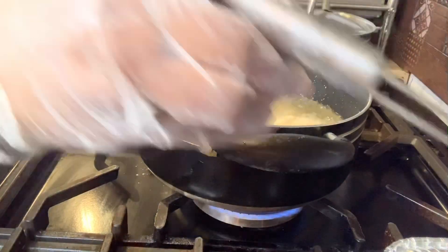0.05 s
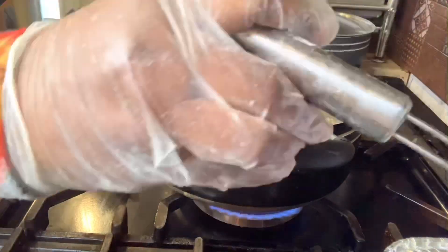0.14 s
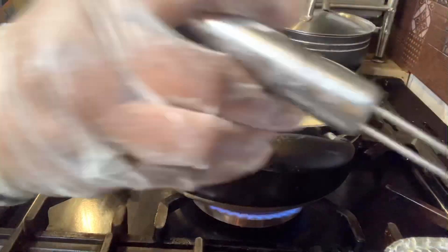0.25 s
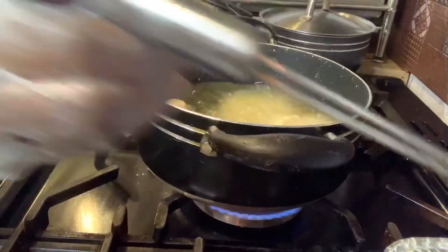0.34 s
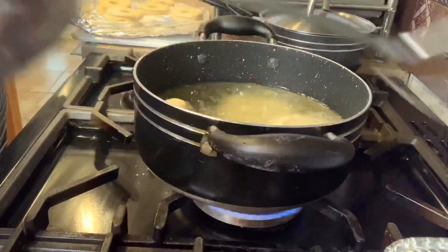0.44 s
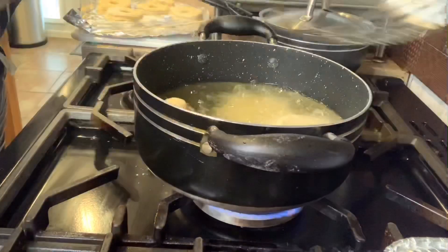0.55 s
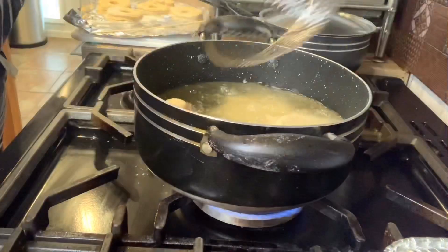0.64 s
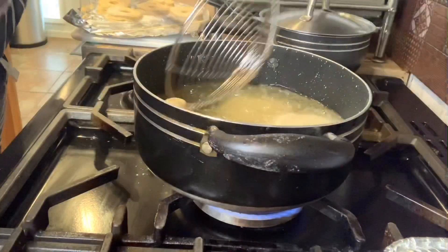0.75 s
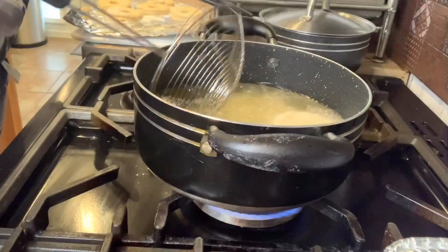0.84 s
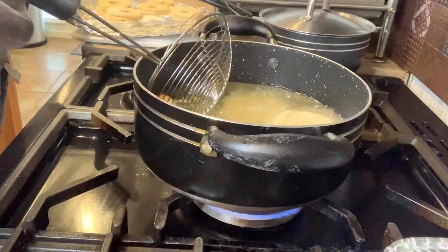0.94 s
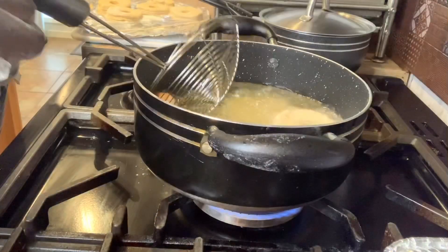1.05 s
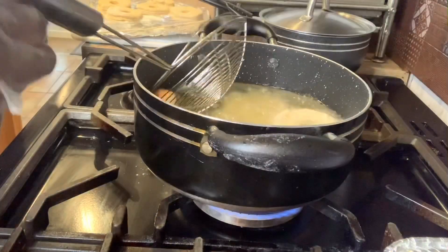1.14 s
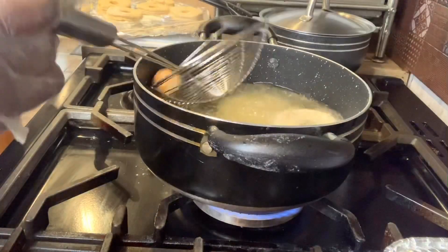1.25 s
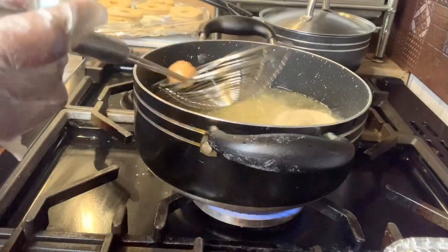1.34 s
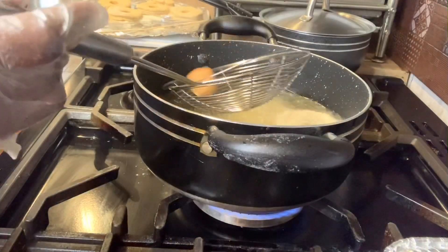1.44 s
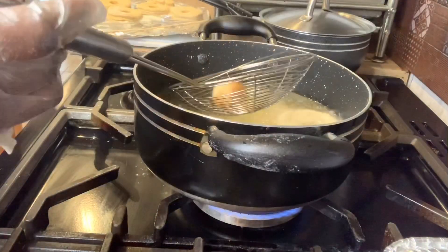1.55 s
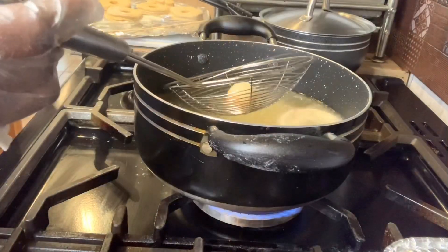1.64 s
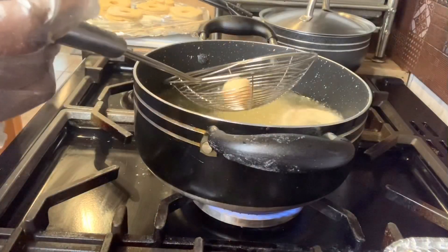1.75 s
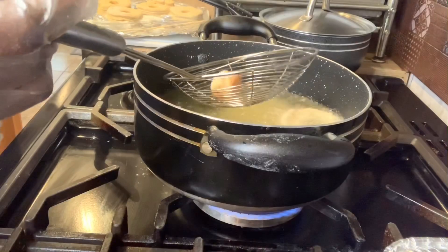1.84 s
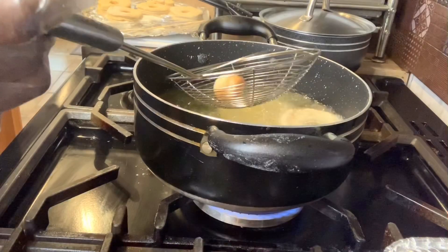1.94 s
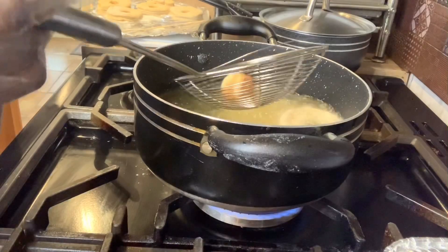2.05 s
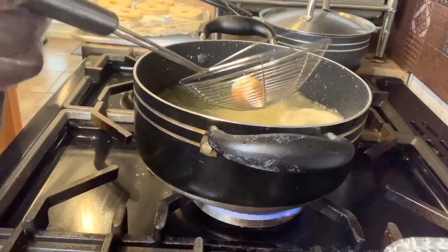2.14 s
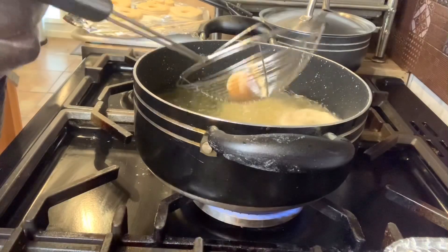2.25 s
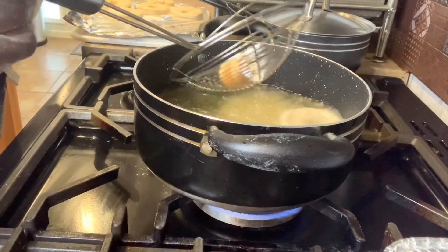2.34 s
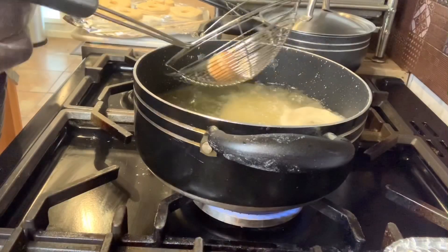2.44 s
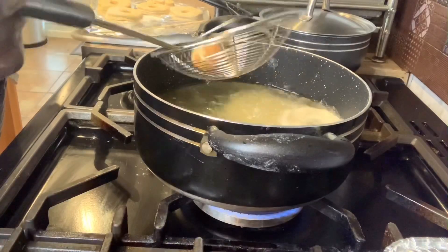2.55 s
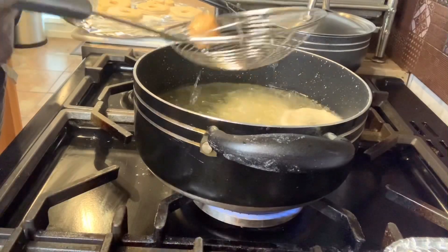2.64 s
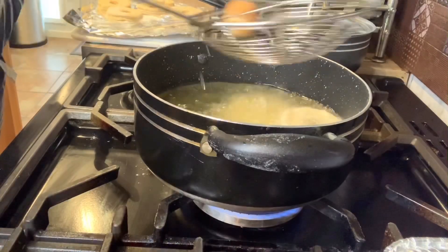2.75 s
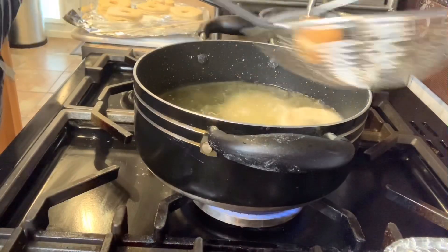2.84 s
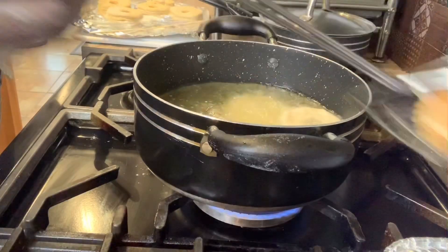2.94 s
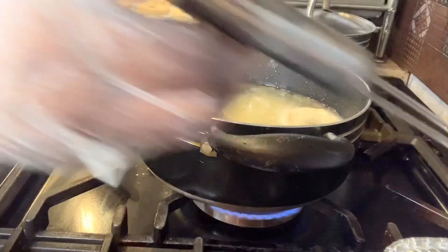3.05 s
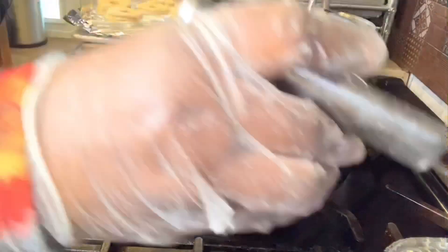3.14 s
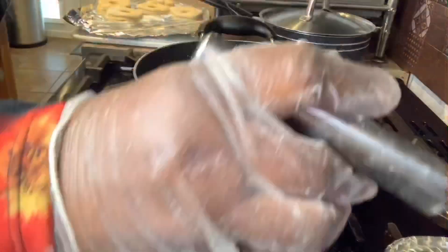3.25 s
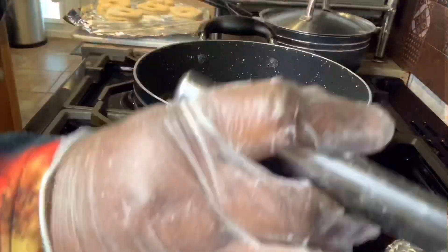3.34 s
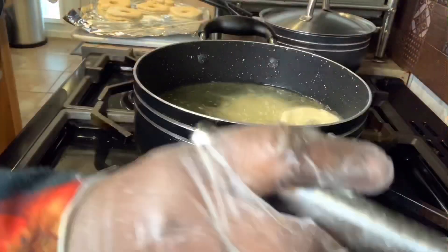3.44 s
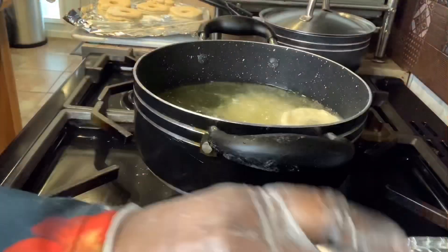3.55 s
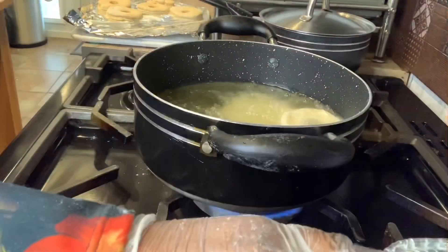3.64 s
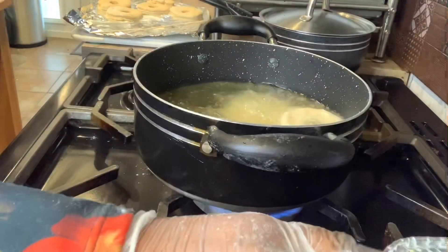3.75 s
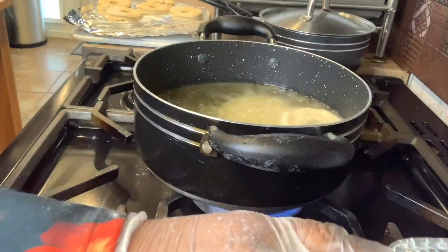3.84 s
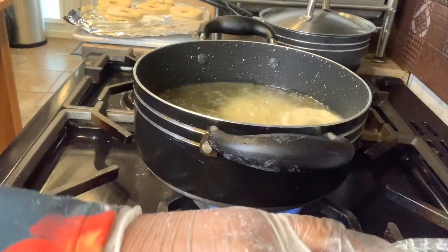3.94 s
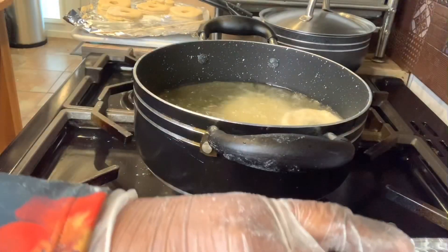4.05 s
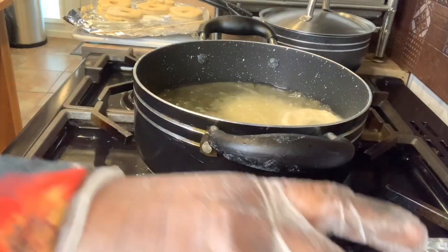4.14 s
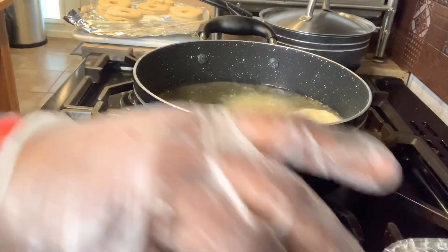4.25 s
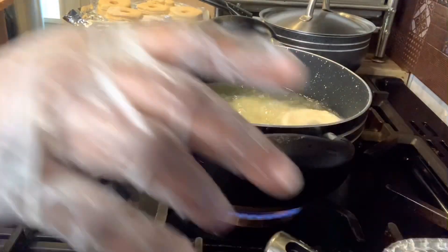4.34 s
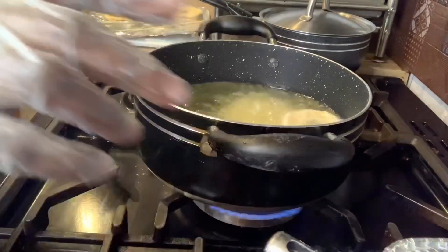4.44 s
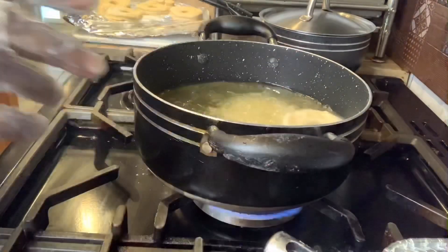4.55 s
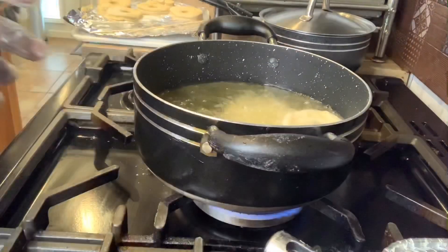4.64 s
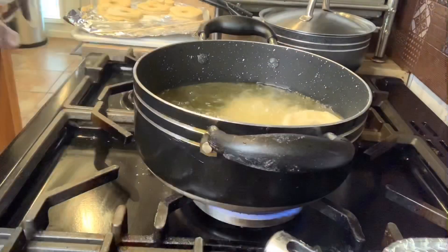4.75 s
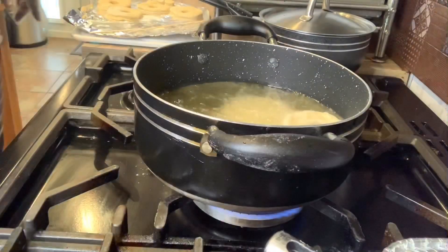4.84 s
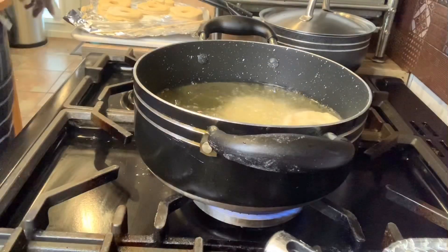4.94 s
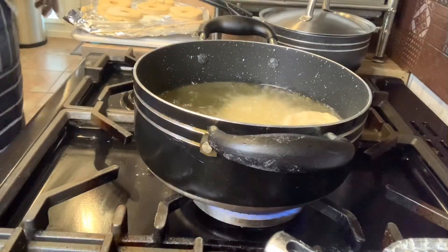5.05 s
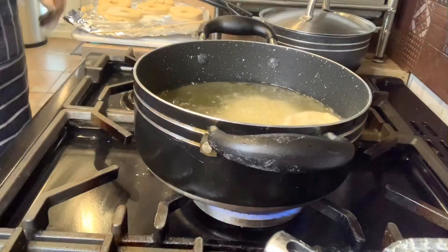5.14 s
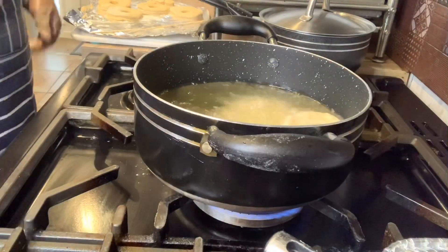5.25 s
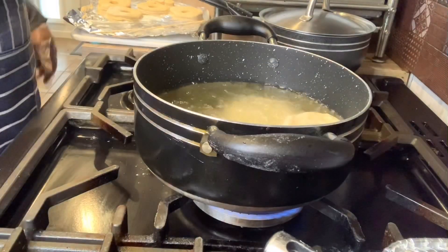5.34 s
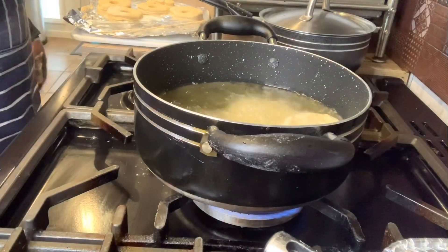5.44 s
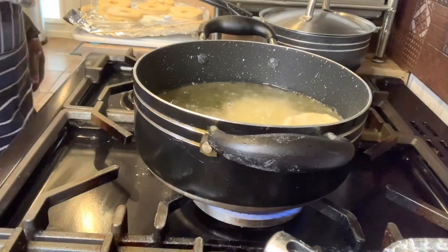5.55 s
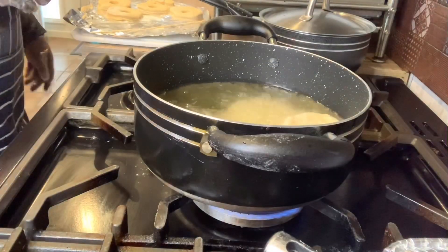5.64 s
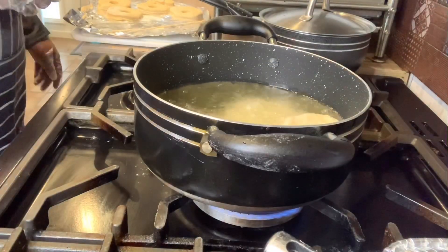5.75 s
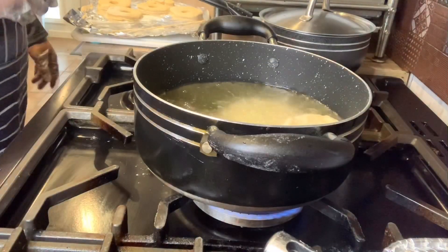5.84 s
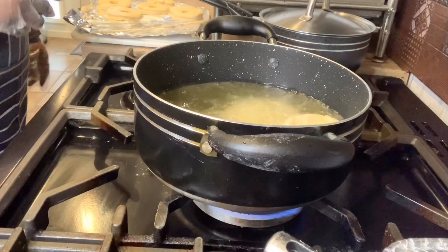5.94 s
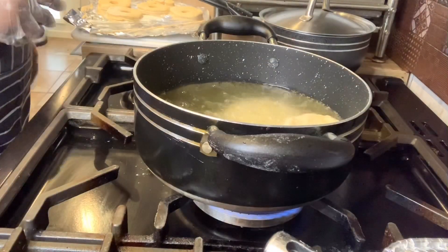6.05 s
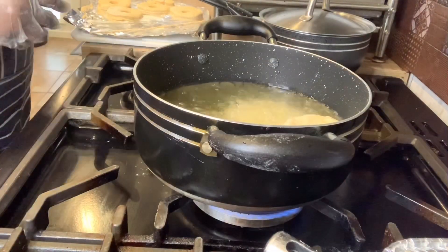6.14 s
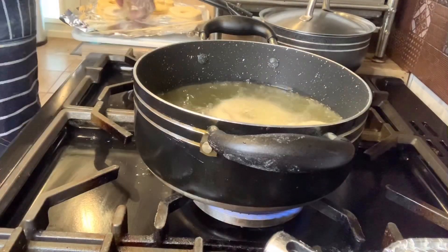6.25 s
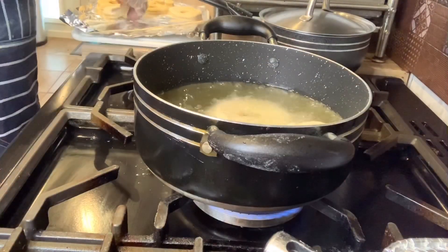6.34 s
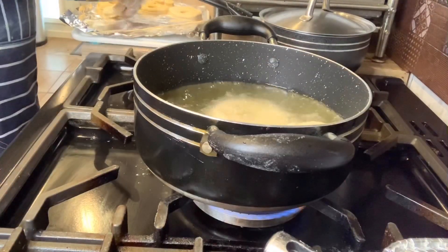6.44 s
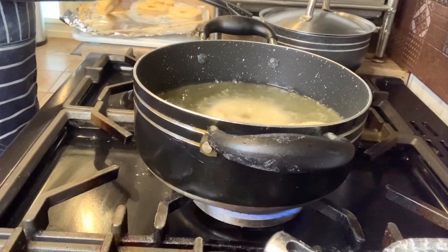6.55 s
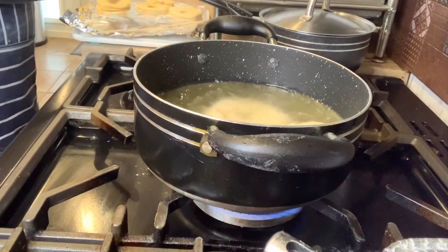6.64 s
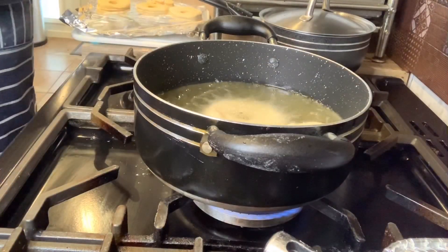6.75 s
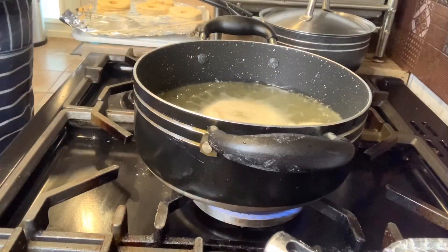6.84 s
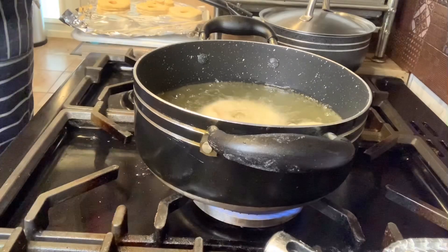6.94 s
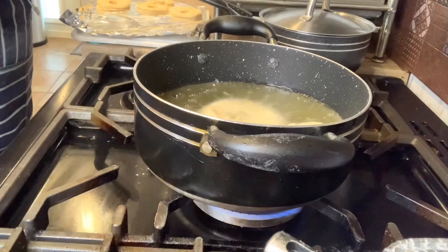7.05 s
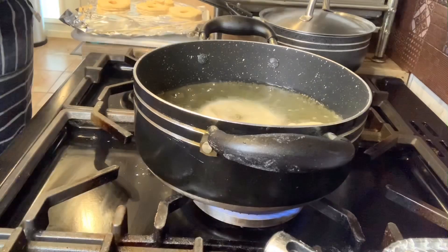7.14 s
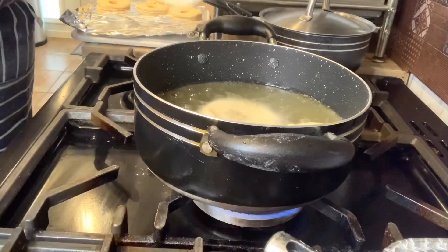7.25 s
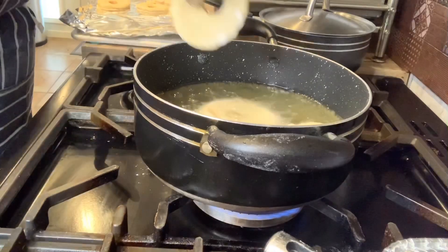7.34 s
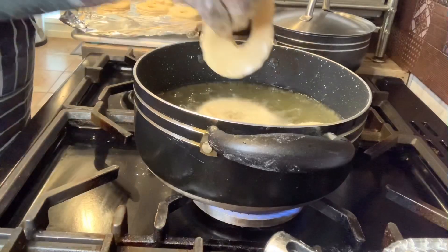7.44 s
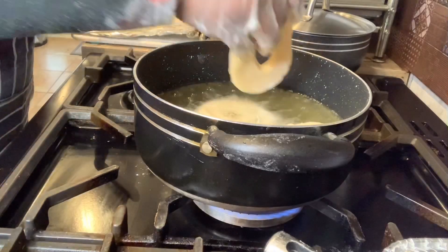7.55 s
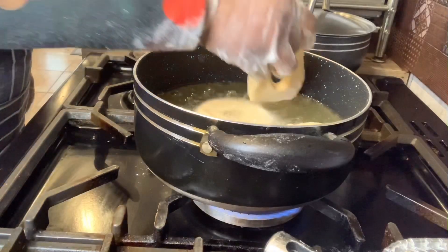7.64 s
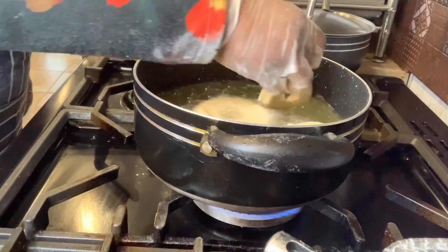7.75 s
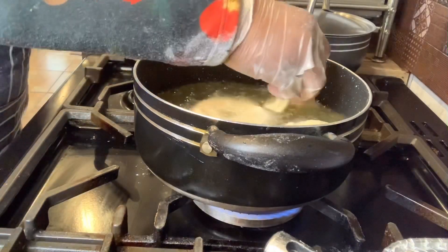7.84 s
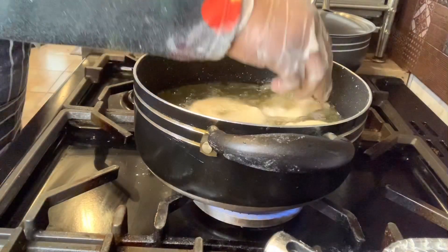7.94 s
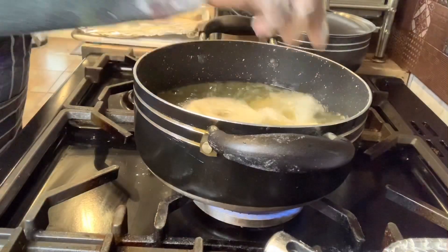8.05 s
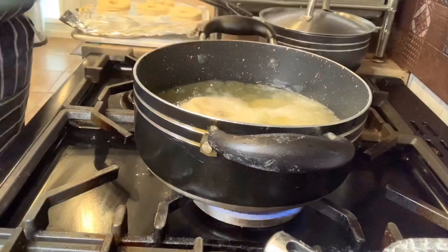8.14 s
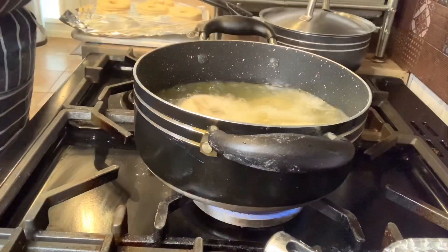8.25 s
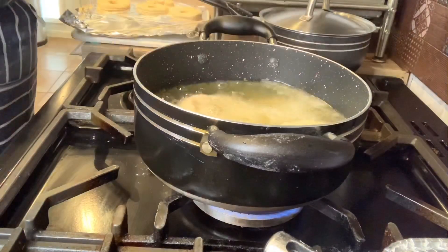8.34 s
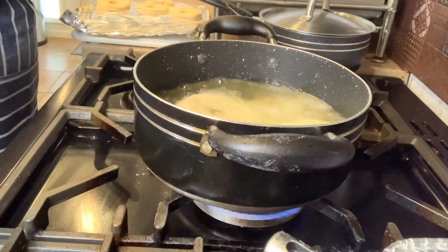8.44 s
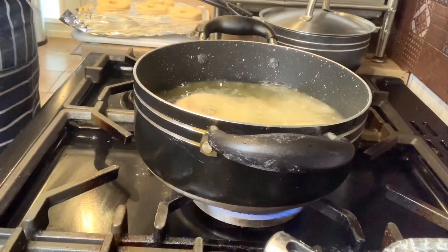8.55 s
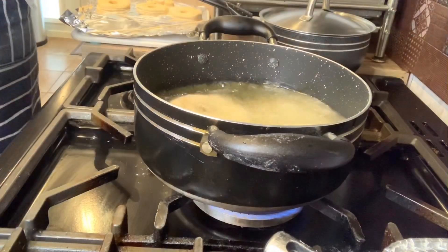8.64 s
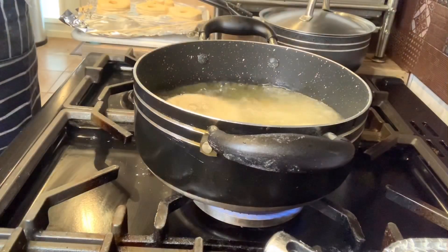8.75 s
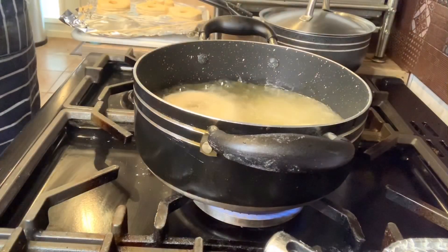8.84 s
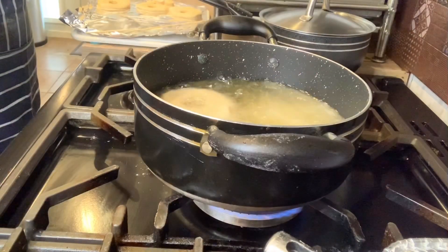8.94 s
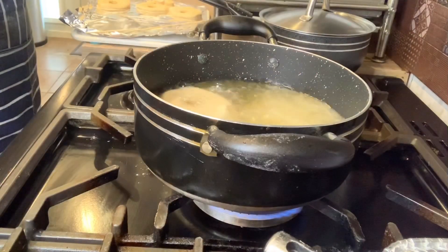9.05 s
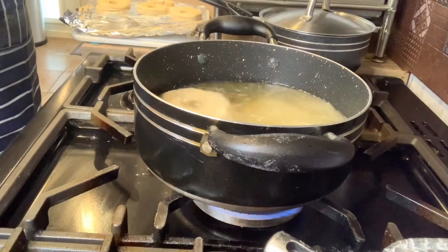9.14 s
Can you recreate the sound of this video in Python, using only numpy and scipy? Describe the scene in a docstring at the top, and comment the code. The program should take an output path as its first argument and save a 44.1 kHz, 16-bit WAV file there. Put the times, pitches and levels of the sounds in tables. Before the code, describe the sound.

Dough frying gently in a pot of hot oil, with light wire clinks, a sharp utensil clatter on the hob and brief plastic glove crinkles.

```python
"""A small kitchen: doughnuts fry gently in a pot of oil on a gas hob, near a humming fridge.
The frying is shaped noise with dense bursts, small bubble notes and snapping spits; the fridge is a set of
sines, the burner coloured noise with a thin whistle. A wire skimmer clinks on the pot and a utensil clatters
down beside the hob, each contact a sum of decaying modes and noise. A plastic glove rustles as clumped grains
and cloth swishes as soft noise. The room answers the handling and the pot with a decaying diffuse tail."""
import sys
import numpy as np
from scipy import signal
from scipy.fft import rfft, irfft, next_fast_len
from scipy.io import wavfile
from scipy.ndimage import map_coordinates

SR = 44100
rng = np.random.default_rng(int(sys.argv[2]) if len(sys.argv) > 2 else 0)


def put_to_file(sound):
    """Save the sound as 16-bit audio at rate SR, in the file named by the first command-line argument."""
    columns = np.atleast_2d(sound).T  # one column per channel
    safe = np.clip(columns, -1, 1)
    whole_steps = np.round(safe * 32767)
    wavfile.write(sys.argv[1], SR, whole_steps.astype(np.int16))


N = 405367
TIME = np.arange(N) / SR
AGE = TIME[:SR // 2]  # time since the onset of one short event, s

# noise spectrum of thin plastic, also used for the skimmer's ticks: frequency_hz, level_db (per Hz)
PLASTIC_SPECTRUM = [(200, -48), (1000, -10), (2500, -11), (4300, -0.5), (7000, 2), (10000, 7.5), (12000, 5),
                    (16000, 5)]
# modes of the pot with the skimmer's wires against it: frequency_hz, level_db, t60_s
POT_MODES = [(1128, -1, 0.28), (1319, -7, 0.24), (1460, 2.5, 0.12), (1550, 1.5, .07), (1650, 1, .06),
             (2063, 7, 0.14), (2660, -0.5, .08), (3040, 5.5, 0.089), (3150, 5.5, .06), (3410, 0, .06),
             (3654, 2.5, 0.069), (3846, 6.5, .07), (4340, -6, 0.11), (5090, 1, 0.072), (5615, -2, 0.17),
             (6400, 7.5, 0.063), (7120, 3, .1), (7380, 4, 0.031), (9320, 15.5, .07)]


def amp(db):
    """Level law: decibels become an amplitude ratio."""
    return 10 ** (np.asarray(db) / 20)


def unit(x):
    """Power normalisation: scale to rms 1."""
    return x / np.sqrt(np.mean(x ** 2) + 1e-20)


def unit_attack(x):
    """Onset normalisation: scale the first hundredth of a second to rms 1."""
    return x / np.sqrt(np.mean(x[..., :SR // 100] ** 2) + 1e-20)


def along(points, hz):
    """Logarithmic pitch scale: interpolate (frequency_hz, value) points on it."""
    f, v = np.transpose(points)
    return np.interp(np.log(hz + 1), np.log(f + 1), v)


def fade(t60):
    """Exponential damping: the amplitude falls 60 dB in t60 seconds."""
    return np.exp(-np.log(1000) * AGE / t60)


def swell(table):
    """Superposition of bell-shaped envelopes from rows of start_s, level_db, width_s."""
    return sum(amp(db) * np.exp(-((TIME - s) / width) ** 2) for s, db, width in table)


def wobble(rate):
    """Slow random fluctuation: a smooth curve through rate random knots a second."""
    return map_coordinates(rng.standard_normal(int(N * rate / SR) + 4), [TIME * rate])


def filtered(x, response):
    """Linear filtering: multiply the spectrum of x by a response of frequency."""
    n = x.shape[-1]
    m = next_fast_len(n + SR // 4)
    return irfft(rfft(x, m) * response(np.fft.rfftfreq(m, 1 / SR)), m)[..., :n]


def noise(spectrum, size=N):
    """Incoherence: two unrelated noises of one colour, together rms 1."""
    white = rng.standard_normal((2, size))
    return unit(filtered(white, lambda hz: amp(along(spectrum, hz))))


def crackle(spectrum, rate, spread_db):
    """Shot noise: rate tiny bursts a second at random moments, exponentially spread in dB, rms 1."""
    happens = rng.random(N) < rate / SR
    sizes = amp(spread_db * np.minimum(rng.exponential(size=N), 6)) * happens
    power = np.abs(signal.fftconvolve(sizes ** 2, fade(0.0022) ** 2)[:N])
    return unit(np.sqrt(power) * noise(spectrum))


def add(track, s, sound):
    """Superposition: mix a sound into a track at time s."""
    start = max(round(s * SR), 0)
    track[:, start:start + sound.shape[-1]] += sound[..., :N - start]


def ring(modes, weight, spread_db):
    """Modal superposition: damped sines at random strengths, alternate modes in opposite senses."""
    quarter_cycle = np.pi / 2 * np.arange(2)[:, None]  # offset of the unshared part
    total = np.zeros((2, len(AGE)))
    for k, (hz, db, t60) in enumerate(modes):
        strength = amp(db + weight(hz) + spread_db * rng.standard_normal((2, 1)))
        total += (-1) ** k * strength * fade(t60) * np.sin(2 * np.pi * hz * AGE + quarter_cycle)
    return total


def fridge():
    """Tonal machine noise: compressor lines wavering in level and phase, with no unshared part."""
    # compressor lines: frequency_hz, level_db
    motor_lines = [(49.5, -83), (56.5, -55), (113, -59.5), (146, -68.5), (226, -67.5), (295.5, -70)]
    hum = np.zeros(N)
    for hz, db in motor_lines:
        phase = 2 * np.pi * hz * TIME + 0.65 * wobble(1.815)
        hum += amp(db + 0.1 * wobble(2.8)) * np.sqrt(2) * np.sin(phase)
    return np.array([hum, np.zeros(N)])


def burner():
    """Turbulent flow noise: the flame rumbles unsteadily and gas hisses in the burner tube."""
    # flame spectrum: frequency_hz, level_db (per Hz)
    flame = [(20, -27), (35, 0.5), (60, 6), (85, 4), (140, 1), (185, -4.5), (290, -4.5), (370, -11),
             (450, -13), (600, -12.5), (850, -17), (2500, -23.5), (8000, -90)]
    # gas jet spectrum: frequency_hz, level_db (per Hz)
    jet = [(900, -6.5), (1350, -33), (1620, 19), (1850, 12.5), (2100, 0), (3000, -45)]
    rumble = amp(-55 + 1.2 * wobble(9)) * noise(flame)
    hiss = amp(-62.0) * noise(jet)
    return rumble + hiss


def whistle():
    """Frequency modulation: a thin unsteady whistle, likely the gas jet, creeps up in pitch."""
    # level of the whistle: time_s, level_db
    level_points = [(0, -75), (1.2, -76), (2.9, -60), (3.3, -64), (4.3, -77), (4.7, -59.5), (5.7, -66),
                    (5.85, -76), (6.8, -61), (7.6, -66), (8.2, -61.5), (9.1, -62)]
    start_hz, creep_hz_per_s = 11270, 5
    hz = start_hz + creep_hz_per_s * TIME + 20 * wobble(100) + 10 * wobble(3)
    db = np.interp(TIME, *np.transpose(level_points)) + 1.5 * wobble(12)
    return amp(db) * np.sin(2 * np.pi * np.cumsum(hz) / SR) * [[1], [.3]]  # shared, unshared


def cloth():
    """Friction noise: sleeve and apron swish softly as the cook moves."""
    # swishes: start_s (centre), level_db, width_s
    swishes = [(3.187, -46, 0.024), (5.47, -55, 0.12)]
    return swell(swishes) * noise([(200, -14), (1200, 5), (3500, 2.5), (7000, -2), (15000, -26)])


def glove():
    """Buckling of thin plastic: dense clumped grains; each stroke sags in level, then dies away."""
    # strokes: start_s, level_db, length_s, attack_s
    strokes = [(3.16, -40.5, .005, .007), (3.38, -43.5, 0.31, 0.11), (6.18, -35.5, 0.081, 0.017),
               (6.326, -39, 0.1, .007), (6.466, -32.5, 0.074, 0.025)]
    # sharpest crinkles: start_s (centre), level_db, width_s
    sharp_crinkles = [(6.197, -32, .007), (6.342, -34, .005), (6.387, -41, .003), (6.415, -37, .004),
                      (6.473, -29, .002), (6.495, -28, .002), (6.52, -28.5, .007)]
    snap_db, snap_s = 3.5, .018  # extra level at the start, and its decay
    sag_db_per_s, release_s, clump_db = 20, 0.035, 1.5
    level = np.zeros(N)
    for s, db, length, attack in strokes:
        age = np.maximum(TIME - s, 0)
        level_db = db + snap_db * np.exp(-age / snap_s) - sag_db_per_s * age
        release = np.exp(-np.maximum(age - length, 0) / release_s)
        level += amp(level_db) * np.minimum(age / attack, 1) * release
    clumps = amp(clump_db * wobble(130))
    grains = crackle(PLASTIC_SPECTRUM, rate=7900, spread_db=-7.5)
    return np.hypot(level, swell(sharp_crinkles)) * clumps * grains


def scrapes():
    """Stick-slip friction: the skimmer's wire slips over steel in uneven clumps of tiny contacts."""
    # scrapes: start_s (centre), level_db, width_s
    slips = [(.163, -45, .01), (.232, -46, .018), (.28, -53, .031), (3.567, -30, 0.0055),
             (3.875, -46, 0.016), (4.02, -54.5, 0.039), (4.18, -56, 0.034), (4.565, -54, 0.035),
             (4.67, -61, 0.059)]
    spectrum = [(100, -14), (350, 8.0), (900, 3.5), (1500, -11), (2200, -7.0), (4000, -5),
                (7000, -24), (15000, -40.5)]
    clumps = unit(amp(3.5 * wobble(110)))
    return swell(slips) * clumps * crackle(spectrum, rate=2500, spread_db=2.5)


def blow(ring_db, thud_db, edge_db, panel_db, panel_hz, rise):
    """Impact excitation: a blow drums a panel, rings the hob, rattles loose parts and thuds in the worktop."""
    # low modes of the worktop: frequency_hz, level_db, t60_s
    worktop = [(62, -15, .12), (100, -1, .08), (120, -2, .09), (146, 2, .1), (170, -7, .09), (280, -6, .06)]
    # modes of the hob's sheet steel: frequency_hz, level_db, t60_s
    hob = [(208, -9, .3), (234, -7, .25), (253, -8, .2), (270, -7, .2), (322, -6, .24), (383, -10, .18),
           (492, -13, .26), (548, -11, .16), (619, -9, .22), (690, -8, .22), (797, -3, .3), (825, -5, .22),
           (873, -4, .26), (900, -6, .18), (925, -4, .2), (949, -5, .18), (1016, -6, .2), (1176, -7, .18),
           (1279, -6, .26), (1346, -5, .24), (1380, -6, .22), (1437, -6, .22), (1547, -5, .18),
           (1601, -4, .16), (1728, -5, .16), (1884, -10, .18), (2176, -10, .18), (2266, -11, .22),
           (2503, -14, .17), (3011, -16, .16), (3186, -15, .17), (3391, -14, .18), (3558, -14, .17),
           (4107, -17, .17)]
    # spectrum of the rattling parts: frequency_hz, level_db (per Hz)
    clatter = [(60, -26), (200, -2), (320, -1), (440, -6), (620, -2), (800, 0), (950, 0), (1150, -3),
               (1400, -1), (1650, -.5), (1950, -7), (2400, -13), (3000, -14), (6000, -19), (16000, -44)]
    # spectrum of the bright edge of hard contact: frequency_hz, level_db (per Hz)
    hard_edge = [(500, 5), (2000, 2.5), (2800, 3.5), (3800, 3), (5500, -9), (6600, -3), (7500, -15.5),
                 (9500, -2.5), (12000, -18.5), (16000, -22)]
    heavy_db, light_range_db, light_sustain = -22, 10, .2
    load_detune = .006  # share by which the utensil's weight detunes the hob, at random
    spread, panel_t60_s = 1.13, .07  # frequency ratio reached by the panel's close modes; brief decay

    thud = np.zeros((2, len(AGE)))
    for k, (hz, db, t60) in enumerate(worktop):
        phase = 2 * np.pi * hz * AGE + np.array([[0], [2.0]])
        thud += (-1) ** k * amp(db) * fade(t60) * np.sin(phase)
    low = amp(thud_db) * unit_attack(thud) * np.array([[1], [1.9]])  # unshared part stronger

    # after a lighter blow the utensil stays in contact and damps the steel more
    sustain = np.interp(ring_db, [heavy_db - light_range_db, heavy_db], [light_sustain, .6])
    damping = sustain + (1 - sustain) * fade(0.08)
    loaded = [(hz * (1 + load_detune * rng.standard_normal()), db, t60) for hz, db, t60 in hob]
    steel = amp(-3) * unit_attack(ring(loaded, lambda hz: 0, spread_db=2.5) * damping)

    band = [(panel_hz / spread ** 2, -40), (panel_hz / spread, -6), (panel_hz, 0),
            (panel_hz * spread, -6), (panel_hz * spread ** 2, -40)]
    drumming = noise(band, size=len(AGE)) * fade(panel_t60_s)
    # scaled by its whole energy, as if spent in 10 ms
    panel = drumming / np.sqrt(np.sum(drumming ** 2) / (2 * SR * .01))

    chatter = unit(amp(4 * wobble(260)[:len(AGE)]))
    rattle = amp(-1) * noise(clatter, size=len(AGE)) * chatter * fade(0.1)
    edge_decay = fade(0.018) + amp(-7.5) * fade(0.13)
    edge = unit_attack(noise(hard_edge, size=len(AGE)) * edge_decay)
    onset = 1 - np.exp(-(AGE / max(rise, 1e-4)) ** 2)
    return onset * (amp(ring_db) * (steel + rattle) + amp(panel_db) * panel + low + amp(edge_db) * edge)


def knocks():
    """Repeated impact: a utensil lands, tips over and rocks to rest, each contact struck differently."""
    # contacts with hob and worktop: start_s, ring_db, thud_db, edge_db, panel_db, panel_hz, rise_s
    contacts = [(.168, -37.5, -49, -45, -50, 600, 0.0013), (.184, -36.5, -32, -36, -36, 1114, 0.0049),
                (.204, -36.5, -51, -44, -35, 846, 0.001), (.316, -30.5, -44, -32.5, -32.5, 860, 0.00037),
                (.334, -39.5, -52, -60, -39, 1180, .002), (0.8708, -44.5, -50, -58, -54, 606, .001),
                (3.208, -32, -29, -39, -39, 664, 0.0028), (3.233, -38, -38, -62, -36, 546, 0.0025),
                (3.248, -42, -45, -63, -39, 960, .002), (3.569, -17, -19.5, -21, -12, 906, .0028),
                (3.580, -25.5, -19.5, -23, -25, 342, 0.0011), (3.597, -26, -25, -19.5, -26, 2170, 0.00061),
                (3.604, -24.5, -42, -33, -22.5, 865, 0.0016), (3.619, -34, -35, -24, -27, 240, 0.0018),
                (3.646, -28, -37, -39, -24, 870, 0.0033), (3.673, -36, -38, -49, -35.5, 1260, 0.0015),
                (3.759, -38, -38, -36, -41, 230, 0.0023), (3.7901, -38, -42.5, -36, -39.5, 1370, .0015),
                (3.826, -41, -52, -47, -50, 950, 0.0017), (3.843, -35.5, -54, -39, -37, 960, 0.0017),
                (3.854, -37, -48, -34, -43, 227, 0.0011), (3.864, -41.5, -41, -46, -37.5, 780, .002),
                (3.995, -50, -58, -57, -58, 600, 0.0035), (4.155, -42.5, -52.5, -38.5, -51, 626, 0.0021),
                (4.244, -47, -58, -39.5, -51, 620, 0.0033), (4.312, -54, -62, -48.5, -62, 600, 0.0024),
                (4.515, -47.5, -51, -40.5, -59, 620, 0.0033), (4.622, -50, -59, -45, -56, 620, 0.0021),
                (9.053, -58, -51, -70, -51.5, 694, 0.0014)]
    out = np.zeros((2, N))
    for s, *contact in contacts:
        add(out, s, blow(*contact))
    return out


def skimmer():
    """Selective modal excitation: ticks wake pot modes near one pitch; low sines give swings and booms."""
    # wire contacts, and the bright snaps of two hard knocks: start_s, ring_db, centre_hz (of the modes), tick_db
    clinks = [(.1063, -47, 4500, -57), (.3165, -51, 5570, -39), (.351, -46.5, 5860, -54),
              (.8694, -30.5, 1530, -26), (.8712, -38.5, 6000, -43), (.8726, -33, 2000, -35),
              (1.024, -50, 1440, -72), (1.1335, -46, 6400, -52), (1.135, -33.5, 3050, -53),
              (1.138, -37, 3750, -57), (1.161, -47, 1490, -64), (3.212, -45, 3530, -60),
              (3.3272, -45.5, 3740, -63), (3.598, -26.5, 6550, -18), (3.912, -50, 3200, -53),
              (4.083, -46.5, 4100, -44), (4.881, -46.5, 5160, -59), (5.398, -50.5, 6200, -46),
              (5.406, -52, 6400, -51), (6.9402, -44.5, 6360, -45)]
    # dull swings of the pot, and low booms of the hob under the heaviest blow:
    # start_s (centre), level_db, pitch_hz, length_s
    swings_and_booms = [(.285, -41.5, 156, 0.049), (0.746, -41, 150, 0.02), (.925, -45.5, 139, 0.029),
                        (3.593, -28, 60, 0.017), (3.682, -35.5, 62, 0.035)]
    sustain, damp_s = .38, .07  # the wires stay in contact: share of ring left, t60 of the rest
    damping = sustain + (1 - sustain) * fade(damp_s)
    onset = 1 - np.exp(-AGE / 0.000072)
    out = np.zeros((2, N))
    for s, db, centre_hz, tick_db in clinks:
        nearness_db = lambda hz: max(-45 * np.log2(hz / centre_hz) ** 2, -32)
        metal = unit_attack(ring(POT_MODES, nearness_db, spread_db=-1.0) * damping)
        band = [(centre_hz / 2, -24), (centre_hz, 0), (centre_hz * 2, -28)]
        buzz = unit_attack(noise(band, size=len(AGE)) * fade(0.065))
        tick = unit_attack(noise(PLASTIC_SPECTRUM, size=len(AGE)) * fade(0.018))
        clink = amp(db) * (amp(-2.5) * metal + amp(-12) * buzz)
        add(out, s, onset * (clink + amp(tick_db - 4.0) * tick))
    for s, db, hz, length in swings_and_booms:
        bell = np.exp(-((TIME - s) / length) ** 2)
        out[0] += amp(db + 4.5) * bell * np.sin(2 * np.pi * hz * (TIME - s))
    return out


def bubble(hz):
    """Bubble resonance: a few damped cycles, rising in pitch as the bubble surfaces."""
    cycles = hz * (AGE + 2 * AGE ** 2)
    return np.sin(2 * np.pi * cycles) * np.exp(-cycles / 4) * (1 - np.exp(-cycles))


def blips(count=200):
    """Bubble resonance: small bubbles surface at random; deep-pitched ones tend to be fainter."""
    floor_db, treble_db, range_db = -62, 5, 12
    out = np.zeros((2, N))
    for when, pitch, size, side in rng.random((count, 4)):
        level = amp(floor_db + treble_db * pitch + range_db * size ** 2)
        placing = np.array([[1], [2 * side - 1]])  # shared, unshared
        add(out, when * N / SR, level * bubble(600 * 8 ** pitch) * placing)
    return out


def plops(count=60):
    """Bubble resonance with steam noise: fat bubbles open with a low note and a soft puff."""
    # plops at set times: start_s, level_db, pitch_hz
    set_plops = [(1.354, -56, 720), (1.396, -51.5, 730), (1.743, -54.5, 660), (1.772, -56, 690),
                 (1.869, -53, 1250), (2.58, -54, 744), (2.912, -55, 684), (3.045, -56, 680),
                 (4.845, -52, 894), (6.009, -59, 740), (6.113, -56, 670), (7.317, -63, 420),
                 (7.534, -59, 400), (7.889, -59, 480), (8.543, -63, 670), (8.865, -57.5, 1280)]
    random_db, range_db, low_hz, octaves = -59, 8, 400, 1.8  # others at random, up to random_db
    random_plops = [(when * N / SR, random_db - range_db * size, low_hz * 2 ** (octaves * pitch))
                    for when, size, pitch in rng.random((count, 3))]
    puff_shape = fade(.07) * (1 - fade(.012))
    out = np.zeros((2, N))
    for s, db, hz in [*set_plops, *random_plops]:
        steam = noise([(150, -8), (hz, 0), (1500, -4), (3500, -15), (9000, -40)], size=len(AGE))
        puff = unit_attack(steam * puff_shape)
        add(out, s, amp(db - 3) * (amp(-4) * unit_attack(bubble(hz)) + puff))
    return out


def spits(count=6):
    """Sudden vaporisation: larger steam pockets snap, each at its own pitch, with a short spray."""
    # loudest spits of oil: start_s, level_db, pitch_hz
    loud_spits = [(2.542, -32, 10500), (2.544, -42, 6500), (4.147, -35, 9000), (4.367, -46, 7200),
                  (5.0703, -31, 10500), (5.146, -30.5, 12600), (5.1495, -35, 12700), (5.217, -44, 13500),
                  (5.527, -36, 14500), (5.635, -42, 10500), (5.8335, -36, 14500), (5.842, -44, 10000),
                  (7.965, -38, 12000), (7.993, -32, 10500)]
    faint_db, faint_range_db = -52, 14  # the rest come at random, this loud and weaker
    peak_db, width_hz = 6, 1000  # spectral peak at the pitch
    faint = [(when * N / SR, faint_db - faint_range_db * size, 7000 * 2 ** pitch)
             for when, size, pitch in rng.random((count, 3))]
    spectrum = [(1500, -36), (5000, -2), (8000, 9.0), (13000, 11.5), (16000, 7)]
    snap = fade(0.006) + amp(-18) * fade(0.03)
    out = np.zeros((2, N))
    for s, db, hz in [*loud_spits, *faint]:
        spray = noise(spectrum, size=len(AGE))
        burst = filtered(spray, lambda f: 1 + amp(peak_db) * np.exp(-((f - hz) / width_hz) ** 2))
        add(out, s, amp(db + 2.5) * snap * unit(burst))
    return out


def frying():
    """Boiling noise: steam leaves the dough as a fine hiss with countless small bursting bubbles."""
    # oil spectrum: frequency_hz, level_db (per Hz)
    oil_spectrum = [(300, -18.5), (850, -12.5), (1300, -3), (2800, -6.5), (3700, -4.5), (5300, -4.5),
                    (6500, -0.5), (7500, -4), (8200, -18), (10700, 2.5), (12500, -3.5), (14500, -2.5),
                    (16000, -4.5)]
    # surges when the oil is stirred or fresh dough gives off steam: start_s, gain_db
    surges = [(.8, 3), (1.6, 1.7), (2.7, 0.5), (4.75, 1), (7.75, 1.5)]
    base_db, rise_s, settle_s = -56, 0.32, 0.18  # settle_s is a time constant
    level_db = base_db
    for s, db in surges:
        age = TIME - s
        settling = np.exp(-np.maximum(age - rise_s, 0) / settle_s)
        level_db = level_db + db * np.clip(age / rise_s, 0, 1) * settling
    hiss = amp(3.5 + 0.93 * wobble(17)) * noise(oil_spectrum)
    bubbles = amp(-8.0 + 0.41 * wobble(1.72)) * crackle(oil_spectrum, rate=350, spread_db=0.0)
    return amp(level_db) * (hiss + bubbles)


def pot_ring(x, width_hz, db):
    """Forced resonance: the oil's sound sings in the pot's own modes."""
    def modes(f):
        return sum(amp(level) * 1j * f * width_hz / (hz * hz - f * f + 1j * f * width_hz)
                   for hz, level, _ in POT_MODES)
    return filtered(x, lambda f: 1 + amp(db) * modes(f))


def kitchen(x):
    """Diffuse reverberation: tiled walls answer with decaying noise whose treble dies first."""
    # reverberation time: frequency_hz, t60_s
    decay_points = [(100, 0.42), (1000, 0.42), (4000, 0.38), (14000, 0.13)]
    hz, t, z = signal.stft(rng.standard_normal((2, SR // 2)), SR, nperseg=256)
    decay = np.exp(-np.log(1000) * t / along(decay_points, hz)[:, None])
    tail = signal.istft(z * decay, SR, nperseg=256)[1]
    return signal.fftconvolve(x, tail / np.linalg.norm(tail[0]), axes=1)[:, :N]


def stereo(pair):
    """Interchannel coherence: shared and unshared parts set stereo width and phase between two channels."""
    # likeness of left and right by frequency: frequency_hz, correlation
    alike = [(60, .95), (150, .85), (280, .6), (400, 0), (800, .2), (1100, .3), (1700, -.2), (2800, .15),
             (5000, .1), (6500, .4), (7300, .7), (7800, .99), (9100, .99), (10200, .65), (11200, .7),
             (12000, .99), (13400, .99), (14300, .6), (15400, .95)]
    # phase by which left leads: frequency_hz, lead_turns
    left_lead = [(4000, 0), (6500, -.2), (7300, -.33), (7800, -.485), (9000, -.515), (9700, -.66),
                 (11900, -.99), (13400, -1.01), (14900, -1.3), (15500, -1.49)]
    turn = lambda hz: np.arccos(np.clip(along(alike, hz), -.995, .995)) / 2
    shared, apart = filtered(pair, lambda hz: np.array([np.cos(turn(hz)), np.sin(turn(hz))]))
    # half the lead is given to each side
    lead = lambda hz: np.exp(1j * np.pi * along(left_lead, hz) * np.array([[1], [-1]]))
    return filtered(np.array([shared + apart, shared - apart]), lead)


def scene():
    """Superposition: handling noises and their room sound over the continuous frying."""
    handling = knocks() + scrapes() + glove() + cloth() + spits()
    in_pot = skimmer() + plops()
    oil = pot_ring(frying() + blips(), width_hz=8.5, db=1.0)
    steady = stereo(oil + burner() + whistle() + fridge())
    # the steady sounds lean left above the bass: (Hz, dB up at left and down at right)
    left_db = [(200, -1.2), (600, 1.45), (1700, 1.75), (3000, 1.1), (6500, 0.7), (8000, 0.55)]
    steady = filtered(steady, lambda hz: amp(along(left_db, hz) * np.array([[1], [-1]])))
    room_db, pot_room_db = -11.5, -16
    reflected = kitchen(amp(room_db) * handling + amp(pot_room_db) * in_pot)
    return steady + stereo(handling + in_pot + reflected)


def record(dry):
    """Band limiting: the recorder rolls off the deepest bass and stops dead at its top frequency."""
    top_hz, bass_hz = 15800, 20
    return filtered(dry, lambda hz: (hz < top_hz) * hz ** 2 / (hz ** 2 + bass_hz ** 2))


dry = scene()
out = record(dry)
put_to_file(out)
```